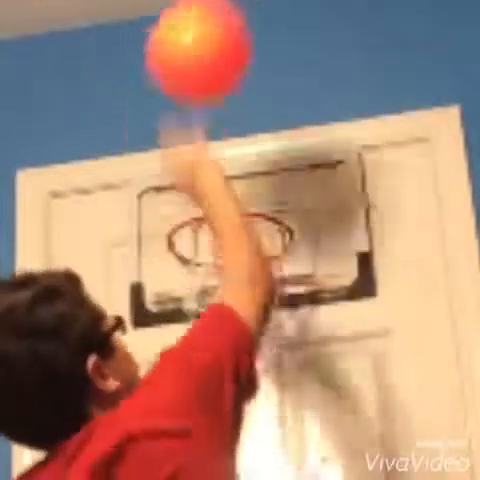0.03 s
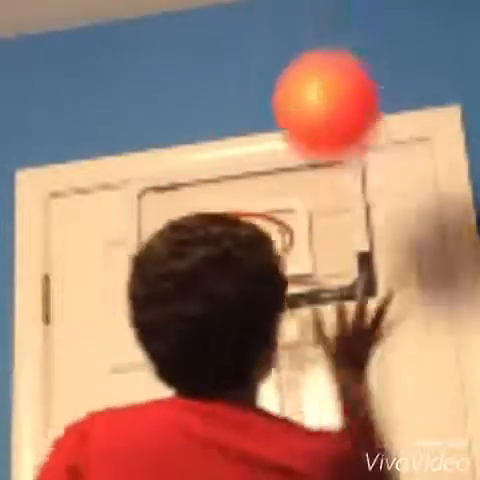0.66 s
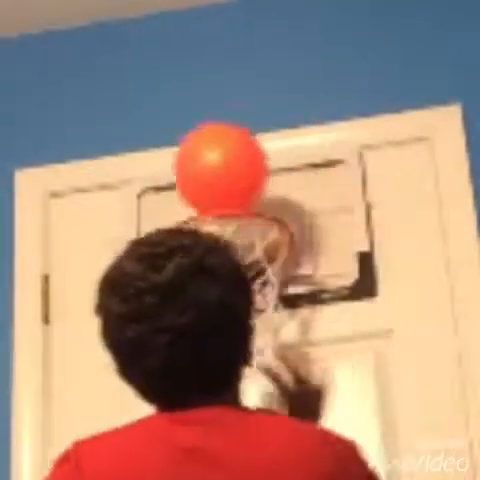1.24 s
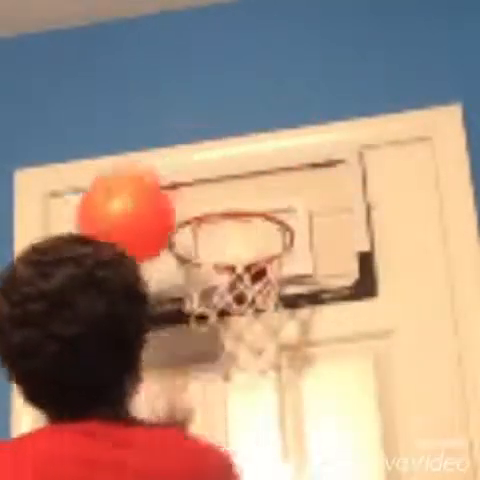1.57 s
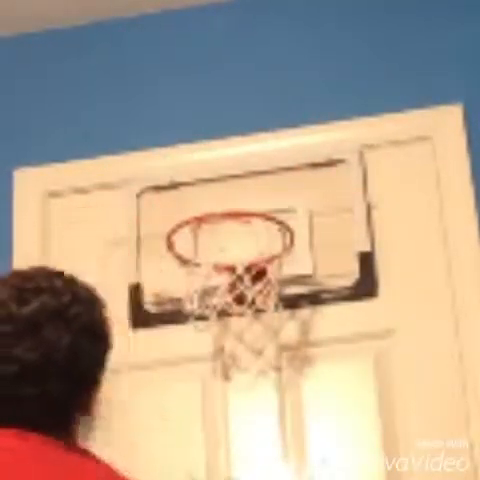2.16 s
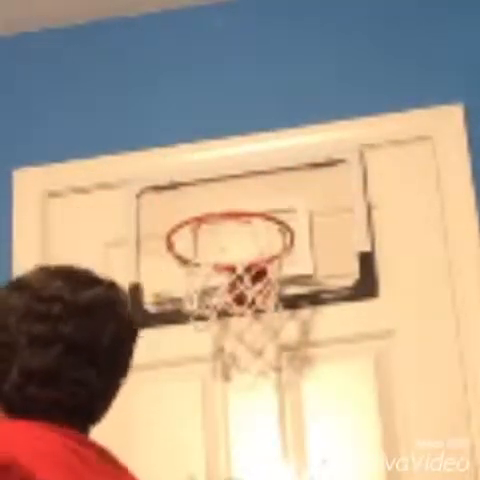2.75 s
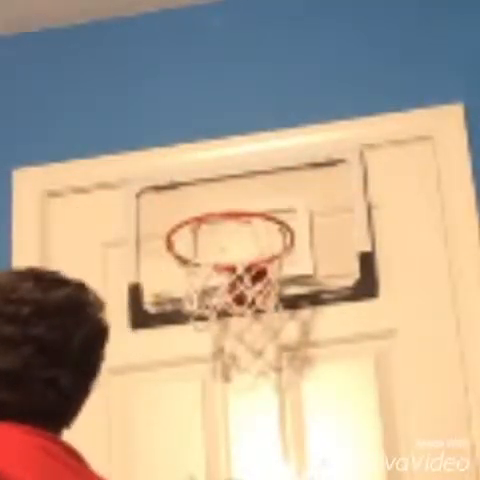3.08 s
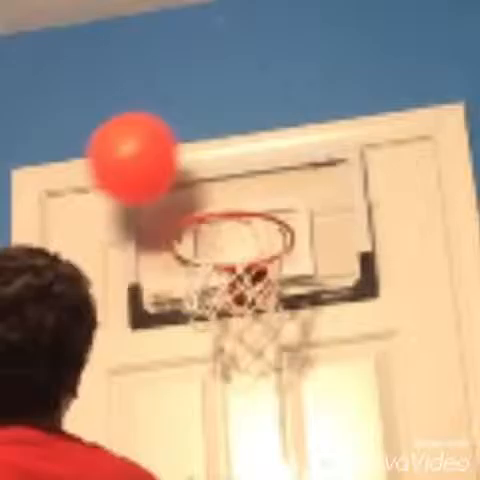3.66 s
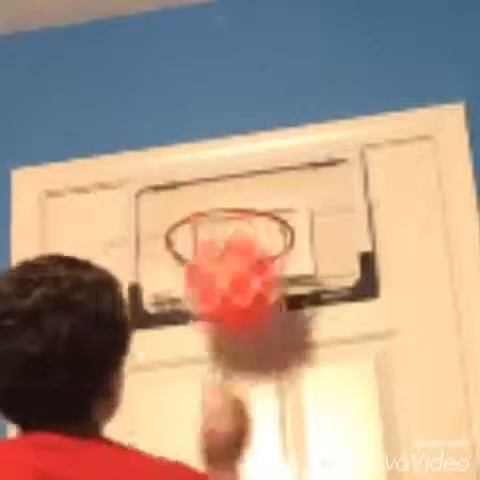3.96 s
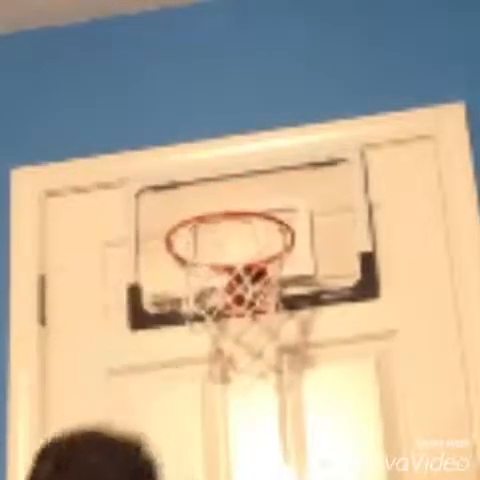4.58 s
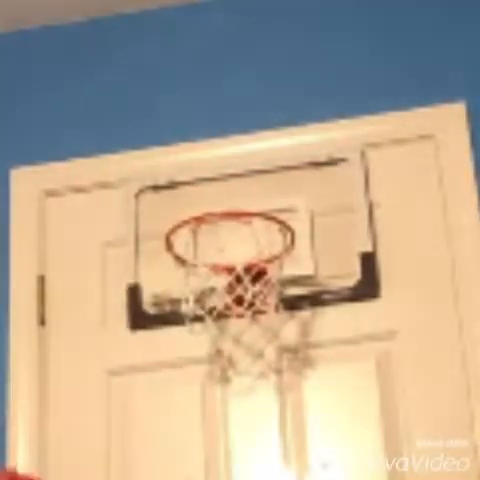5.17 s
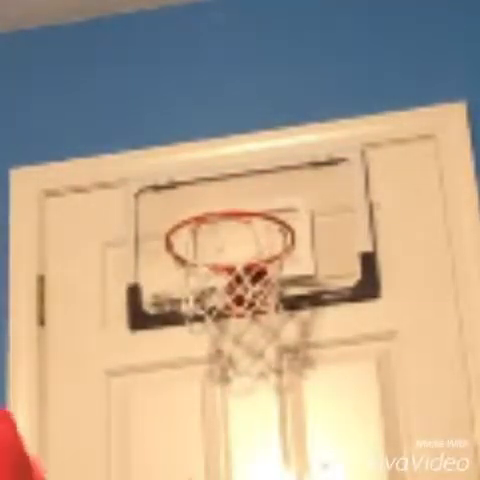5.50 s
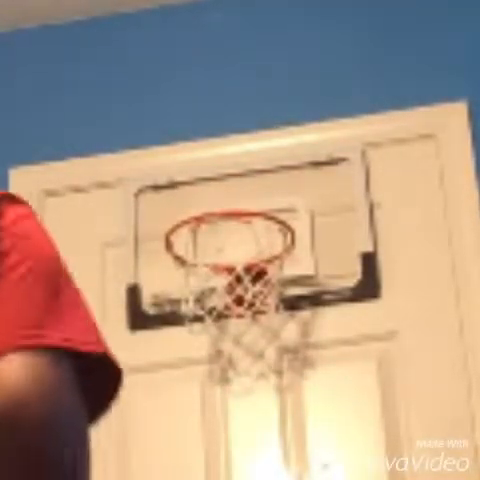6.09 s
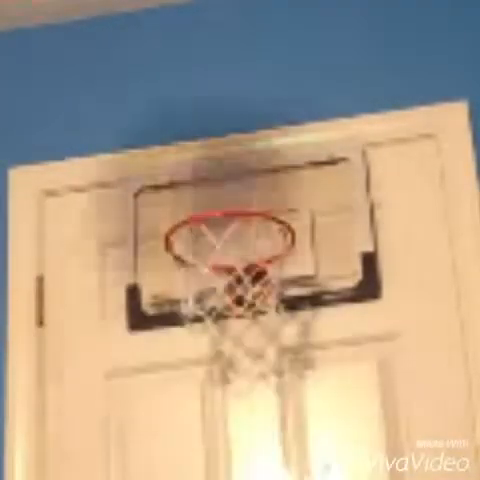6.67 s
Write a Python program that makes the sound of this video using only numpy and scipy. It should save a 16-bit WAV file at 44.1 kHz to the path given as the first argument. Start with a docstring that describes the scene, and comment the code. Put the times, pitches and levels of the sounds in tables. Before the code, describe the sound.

Uneven slaps of a small rubber ball mix with rattling knocks on a mini hoop and a dull floor thud indoors.

```python
"""A small, dry bedroom, heard on one microphone close to a mini hoop hung on the door.
Hands bat a small rubber basketball about: its skin thumps while the air inside pings faintly.
Blows on the hoop make the backboard ring, the door boom and the steel rim chatter in its bracket.
A dull thud comes from the floor, feet scuff and a shirt rustles nearby, over the house's low rumble."""
import sys
import numpy as np
from scipy import signal
from scipy.fft import rfft, irfft, next_fast_len
from scipy.io import wavfile

SR = 44100
rng = np.random.default_rng(int(sys.argv[2]) if len(sys.argv) > 2 else 0)


def put_to_file(sound):
    """Save the sound as 16-bit audio at rate SR, in the file named by the first command-line argument."""
    columns = np.atleast_2d(sound).T  # one column per channel
    safe = np.clip(columns, -1, 1)
    whole_steps = np.round(safe * 32767)
    wavfile.write(sys.argv[1], SR, whole_steps.astype(np.int16))


N = 306054
T = np.arange(int(.8 * SR)) / SR  # time within one blow [s]


def undb(db):
    """Decibels to gain."""
    return 10 ** (np.asarray(db) / 20)


def fade(t60):
    """Exponential decay by 60 dB in t60 seconds."""
    return np.exp(-np.log(1000) * T / t60)


def level(x, db):
    """Set the rms of a blow's first 30 ms."""
    head = x[:int(.03 * SR)]
    return x * undb(db) / np.sqrt(np.mean(head ** 2))


def add(track, s, x):
    """Mix a sound into the track at s seconds."""
    start = int(s * SR)
    track[start:start + len(x)] += x[:N - start]


def colour(x, points):
    """Minimum-phase filter through (frequency [Hz], gain [dB]) points."""
    size = 2 * next_fast_len(len(x))
    hz, db = np.transpose(points)
    freqs = np.maximum(np.arange(size // 2 + 1) * SR / size, 1)
    gain = undb(np.interp(np.log(freqs), np.log(hz), db))
    cepstrum = irfft(np.log(gain))
    # folded so that nothing sounds ahead of a blow
    cepstrum[1:size // 2] *= 2
    cepstrum[size // 2 + 1:] = 0
    return irfft(rfft(x, size) * np.exp(rfft(cepstrum)))[:len(x)]


def cut(x, hz, kind):
    """Low-pass or high-pass."""
    return signal.sosfilt(signal.butter(3, hz, kind, fs=SR, output="sos"), x)


def resonate(x, hz, width_hz, gain_db):
    """Lift one narrow band by adding a copy of it at gain_db."""
    return x + undb(gain_db) * signal.lfilter(*signal.iirpeak(hz, hz / width_hz, fs=SR), x)


def ring(modes, detune=0):
    """Damped sines; each blow pulls them out of tune by a random fraction."""
    return sum(undb(db) * fade(t60) * np.sin(2 * np.pi * hz * (1 + detune * rng.standard_normal()) * T)
               for hz, db, t60 in modes)


def through(x, response):
    """Pass a blow through an impulse response."""
    return signal.fftconvolve(x, response)[:len(T)]


def flutter(rate):
    """A smooth wander through `rate` random values a second."""
    knots = rng.standard_normal(int(N / SR * rate) + 2)
    return np.interp(np.arange(N) / SR * rate, np.arange(len(knots)), knots)


# reflections off surfaces near the microphone: (delay [s], gain [ratio])
NEAR_ECHOES = [(.0042, .7), (.0068, .45), (0.0211, .35)]
def room(wet_db, t60=0.21, damp_hz=6000):
    """A click in the bedroom: direct sound, near echoes, then a diffuse tail unique to each spot."""
    body, treble = rng.standard_normal((2, len(T)))
    tail = cut(body, damp_hz, "low") * fade(t60)
    tail += cut(treble, damp_hz, "high") * fade(t60 * 0.93)  # soft furnishings swallow the treble
    response = tail * undb(wet_db) / np.sqrt(np.sum(tail ** 2))
    response[0] += 1
    for delay, gain in NEAR_ECHOES:
        response[int(delay * SR)] += gain
    return response


# spectrum of the house's rumble and hiss: (frequency [Hz], gain [dB])
ROOM_TONE_COLOUR = [(25, -12.5), (50, -1.5), (80, -1.5), (140, -5), (200, -10.5), (300, -10.5), (420, -16),
                    (520, -18), (720, -20.5), (1600, -29.5), (4000, -34.5), (15000, -43)]
def room_tone(noise_db=-59, drone_hz=117, drone_start_db=-54, fade_db_per_s=1.28):
    """The house behind it all: low rumble, faint hiss and a wavering drone that slowly fades."""
    noise = colour(rng.standard_normal(N), ROOM_TONE_COLOUR)
    pitch = drone_hz * (1 + 0.076 * flutter(rate=34))
    drone = undb(2 * flutter(rate=37)) * np.sin(2 * np.pi * np.cumsum(pitch) / SR)
    drone_db = drone_start_db - fade_db_per_s * np.arange(N) / SR
    return noise / np.std(noise) * undb(noise_db) + drone / np.std(drone) * undb(drone_db)


# shirt and net rustling during play: (time [s], relative level [dB])
RUSTLE_IN_PLAY = [(0.0, -75), (0.27, -73.5), (0.45, -62.5), (0.82, -72), (1.35, -67.5), (1.52, -58),
                  (1.77, -71.5), (2.32, -67), (3.08, -70), (3.25, -76.5), (4.57, -65.5), (5.45, -65.5)]
# then the shirt alone as the player turns near the microphone: (time [s], relative level [dB])
RUSTLE_TURNING = [(5.68, -61), (5.778, -58.5), (6.272, -61), (6.666, -66.5), (6.782, -68.5), (6.94, -71)]
# spectrum of sliding cloth: (frequency [Hz], gain [dB])
CLOTH_COLOUR = [(100, -18.5), (300, -2), (600, -5.5), (1100, -10), (2400, -13), (6000, -26.5),
                (14000, -39.5)]
def shirt(flutter_db=4.0, split_hz=1500, lift_db=1.5):
    """Nearby cloth slides in uneven little bursts; the folds and the fibres swell separately."""
    cloth = colour(rng.standard_normal(N) ** 3, CLOTH_COLOUR)
    folds = cut(cloth, split_hz, "low") * undb(flutter_db * flutter(rate=5.8))
    fibres = cut(cloth, split_hz, "high") * undb(flutter_db * flutter(rate=12))
    times, levels = np.transpose([*RUSTLE_IN_PLAY, *RUSTLE_TURNING])
    db = lift_db + np.interp(np.arange(N) / SR, times, levels)
    return (folds + fibres) / np.std(cloth) * undb(db)


# net, feet and hands brushing: (time [s], decay time [s], body level [dB], hiss level [dB])
RUBS = [(1.331, 0.094, -34, -41.5), (1.444, 0.023, -39, -37.5), (4.667, 0.095, -46, -61.5),
        (4.925, 0.025, -45.5, -53), (5.137, 0.04, -42, -54.5), (6.792, 0.012, -55, -75)]
# spectrum of a rub: (frequency [Hz], gain [dB])
RUB_COLOUR = [(100, 6.5), (350, 0.5), (600, -8), (1500, -13), (2800, -21), (6000, -30), (15000, -36.5)]
def scuffs():
    """Short, grainy rubs around the room, with a dull body and a hiss on top."""
    out = np.zeros(N)
    for s, decay_s, body_db, hiss_db in RUBS:
        grains = rng.standard_normal(len(T)) ** 3 * np.exp(-(T / decay_s) ** 2)
        rub = colour(through(grains, room(wet_db=9.5)), RUB_COLOUR)
        body = level(cut(rub, 1100, "low"), body_db)
        hiss = level(cut(rub, 1400, "high"), hiss_db)
        add(out, s, body + hiss)
    return out


# modes of the floorboards: (frequency [Hz], relative level [dB], t60 [s])
FLOOR_MODES = [(65, -2.5, 0.87), (107.8, 2, 0.57), (157.7, 4.5, 0.28), (173, 4, 0.16), (230, -16, 0.14),
               (315, -9, 0.083)]
# spectrum of the knock on the floor: (frequency [Hz], gain [dB])
FLOOR_KNOCK_COLOUR = [(100, -5), (300, 0), (500, -11), (850, -8), (1150, -18), (1500, -32), (3000, -52),
                      (9000, -80)]
def floor_thud(at_s=4.773, boards_db=-20.5, knock_db=-31, settle_s=.11):
    """A soft weight lands on the boards and damps them as it settles."""
    out = np.zeros(N)
    load = (1 - np.exp(-T / 0.006)) * np.exp(-(T / settle_s) ** 2)
    knock = colour(room(wet_db=24), FLOOR_KNOCK_COLOUR)
    boards = ring(FLOOR_MODES)
    add(out, at_s, level(boards * load, boards_db) + level(knock * load, knock_db))
    return out


def chatter(rate, t60, size):
    """A first blow, then dying random taps of loose parts, about `rate` a second."""
    chance, strength = rng.random(len(T)), rng.standard_normal(len(T))
    taps = (chance < rate / SR) * strength * size * fade(t60)
    taps[0] = 1
    return taps


def rebounds(blows, returns=2, loss_power=1.76, door_share=0.36, metal_loss_db=8.5):
    """Each blow, then its weaker, duller returns as the sprung hoop slaps back against the door."""
    for s, board_db, boom_db, rattle_db, rim_db, spot_hz, gap_s, first_loss_db in blows:
        for k in range(1 + returns):
            loss = first_loss_db * k ** loss_power
            door_loss = door_share * loss  # the heavy door loses least
            metal_loss = loss + metal_loss_db * k
            yield (s + k * gap_s, board_db - loss, boom_db - door_loss,
                   rattle_db - metal_loss, rim_db - metal_loss, spot_hz)


# blows on the hoop: (time [s], board level [dB], door boom level [dB], rattle level [dB],
# rim level [dB], struck spot's tone [Hz], rebound gap [s], board's loss at the first rebound [dB])
HOOP_BLOWS = [(1.325, -19.5, -25, -32, -43, 686, 0.044, 3.5), (1.453, -27, -29.5, -33, -34, 593, .052, 2.5),
              (1.643, -47, -39, -56, -57.5, 402, .052, 2.5), (1.719, -46.5, -44, -56, -65, 592, 0.052, 13),
              (2.2641, -19, -27.5, -36, -48, 527, 0.051, 7), (4.228, -37, -36.5, -42.5, -64, 565, .05, 8),
              (4.275, -28.5, -35.5, -44.5, -65, 557, .059, 12),
              (4.405, -33.5, -36, -50, -55.5, 633, .086, 10), (4.575, -51, -49, -75, -83, 580, .05, 7),
              (4.680, -42.5, -44, -63, -62, 572, 0.053, 18)]
# modes of hoop, backboard and door panel: (frequency [Hz], relative level [dB], t60 [s])
BOARD_MODES = [(224.3, -7.5, 0.62), (271.4, -5.5, 0.49), (321, -3.5, 0.19), (355, -10, 0.326),
               (408, -6.5, 0.26), (519.2, -11.5, 0.56), (559, -0.5, 0.19), (597.3, 4.5, 0.23),
               (646, -7, 0.24), (677.5, -17, 0.202), (759, -10.5, 0.11), (856, -4, 0.093),
               (919.6, -6.5, 0.23), (1080, -22, 0.33), (1370, -13, 0.18), (1480, -12, 0.15)]
# the whole door swaying on its latch: (frequency [Hz], relative level [dB], t60 [s])
DOOR_MODES = [(53.8, -9, 0.46), (86, -4, 0.47), (108.4, -3.5, 0.45), (162, -8.5, 0.27)]
# modes of the steel rim: (frequency [Hz], relative level [dB], t60 [s])
RIM_MODES = [(1320, 0.5, 0.27), (1560, -12.5, 0.23), (2260, 0, 0.167), (2340, 4.5, 0.12), (2420, -1, 0.125),
             (2400, -11.5, .14)]
# spectrum of the board's dense overtones: (frequency [Hz], gain [dB])
OVERTONE_COLOUR = [(120, -10), (230, 7), (400, 5), (600, 2), (800, -12), (1100, -15.5), (2000, -41.5),
                   (5000, -62)]
# spectrum of the rattling bracket: (frequency [Hz], gain [dB])
BRACKET_COLOUR = [(500, -6.5), (1000, 7), (1400, -2), (1850, -5.5), (2350, -6.5), (3000, -11), (5000, -18),
                  (8000, -23), (15000, -35)]
def hoop(overtone_db=-4, spot_t60=0.056):
    """At the door: the struck spot knocks, the board rings, the door booms, rim and bracket rattle."""
    out = np.zeros(N)
    push = 1 - np.exp(-T / 0.0024)  # the soft ball takes a few milliseconds to load the hoop
    for s, board_db, boom_db, rattle_db, rim_db, spot_hz in rebounds(HOOP_BLOWS):
        # every blow lands elsewhere and favours other modes
        modes = [(hz, db + 3 * rng.standard_normal(), t60) for hz, db, t60 in BOARD_MODES]
        tones = through(ring(modes, detune=0.0098), room(wet_db=1))
        overtones = colour(room(wet_db=5.5, t60=0.4), OVERTONE_COLOUR)
        spot = ring([(spot_hz, 0, spot_t60)])
        board = level(tones, 0) + level(overtones, overtone_db) + level(spot, 0)
        boom = ring(DOOR_MODES, detune=0.035)
        bracket_taps = chatter(rate=110, t60=0.29, size=.5)
        rattle = colour(through(bracket_taps, room(wet_db=7.5)), BRACKET_COLOUR)
        rim_taps = chatter(rate=450, t60=0.22, size=.8)
        rim = through(rim_taps, ring(RIM_MODES, detune=.014))
        for part, db in (board, board_db), (boom, boom_db), (rattle, rattle_db), (rim, rim_db):
            add(out, s, level(part * push, db))
    return out


def crack(t60):
    """The brief, gritty burst of surfaces meeting."""
    burst = rng.standard_normal(len(T)) * rng.exponential(size=len(T)) * fade(t60)
    return burst / np.sqrt(np.sum(burst ** 2))


# contacts on the ball: (time [s], smack level [dB], thump level [dB], surface bump level [dB],
# snap level [dB], hollow tone [Hz], centre of the snap [Hz])
BALL_CONTACTS = [(0.2498, -21.5, -17.5, -22.5, -25.5, 627, 2320),
                 (0.6428, -38, -33, -33.5, -39.5, 1140, 2550),
                 (1.0441, -23.5, -19.5, -24.5, -30, 574, 3400), (1.3075, -33.5, -37, -45, -34, 1250, 8400),
                 (2.0166, -29.5, -22, -44, -33.5, 916, 2930), (2.2563, -42, -37, -50, -44, 520, 3920),
                 (2.6347, -27.5, -19, -34.5, -35.5, 667, 6660),
                 (3.081, -36, -31.5, -43.5, -52.5, 375, 2600), (3.6387, -25.5, -21, -23.5, -33, 1506, 7100),
                 (4.1951, -36, -31, -44, -45, 947, 2870), (5.5308, -24.5, -28, -43, -34, 794, 3420),
                 (6.0331, -49.5, -46.5, -46.5, -56.5, 655, 2770)]
# spectrum of a slap on rubber: (frequency [Hz], gain [dB])
RUBBER_COLOUR = [(100, 0), (180, 7.5), (280, -6.5), (370, 2.5), (460, -0.5), (720, -1), (950, -0.5),
                 (1200, -9), (1500, -5), (1800, -12), (2300, -15), (4500, -19), (9000, -25), (15000, -27.5)]
# the ball's skin flexing: (frequency [Hz], relative level [dB], t60 [s])
SKIN_MODES = [(76.7, -13.5, 0.17), (95.2, -0.5, 0.13)]
# wall or panel behind a contact: (frequency [Hz], relative level [dB], t60 [s])
WALL_MODES = [(144.4, 0, 0.29), (170, 6, 0.19), (194.8, -2, 0.29), (231.4, -6, 0.317), (277.5, -6.5, 0.28)]
# modes of the air inside the ball: (frequency [Hz], relative level [dB])
CAVITY_MODES = [(1785, 1), (2205, -5), (2540, -1.5), (2600, -6), (2880, -16), (3634, -5.5), (4030, 2),
                (4918, -13), (5230, -5.5), (6215, -8), (6840, -10)]
def ball(split_hz=2300, ping_below_snap_db=28.5, ping_t60=1.0, swell_s=0.01, grit_db=6, tick_db=6):
    """Up front: each contact cracks, the skin thumps, the surface behind bumps, the air inside pings."""
    out = np.zeros(N)
    for s, smack_db, thump_db, bump_db, snap_db, hollow_hz, snap_hz in BALL_CONTACTS:
        click = room(wet_db=16.5)
        grit = undb(grit_db) * crack(t60=0.038) * (1 - np.exp(-T / 0.0013))
        # the first touch is a sharp tick that comes straight back off the near surfaces
        tick = undb(tick_db) * through(crack(t60=0.01), room(wet_db=-12))
        slap = cut(colour(click + grit + tick, RUBBER_COLOUR), 134, "high")
        # air squeezed between the ball and the surface sounds hollow
        smack = resonate(cut(slap, split_hz, "low"), hollow_hz, width_hz=62, gain_db=2.5)
        snap = resonate(cut(slap, split_hz, "high"), snap_hz, width_hz=snap_hz / 6, gain_db=-1)
        thump = ring(SKIN_MODES, detune=0.02) * (1 - np.exp(-T / swell_s))
        bump = ring(WALL_MODES, detune=.03)
        # the point of contact favours some air modes
        modes = [(hz, db + 4 * rng.standard_normal(), ping_t60) for hz, db in CAVITY_MODES]
        ping = ring(modes + modes, detune=0.0043)  # beating pairs: the ball is not quite round
        for part, db in (smack, smack_db), (snap, snap_db), (thump, thump_db), (bump, bump_db):
            add(out, s, level(part, db))
        add(out, s, level(ping, snap_db - ping_below_snap_db))
    return out


def scene():
    """Everything in the bedroom reaches one microphone."""
    return (ball() + hoop() + floor_thud() + scuffs() + shirt() + room_tone())[None]


def record(dry):
    """The phone's microphone thins the bass below 39 Hz and cuts the top above 15.5 kHz."""
    top_cut = signal.ellip(8, .2, 70, 15500, fs=SR, output="sos")
    return signal.sosfilt(top_cut, cut(dry, 39, "high"))


dry = scene()
out = record(dry)
put_to_file(out)
```